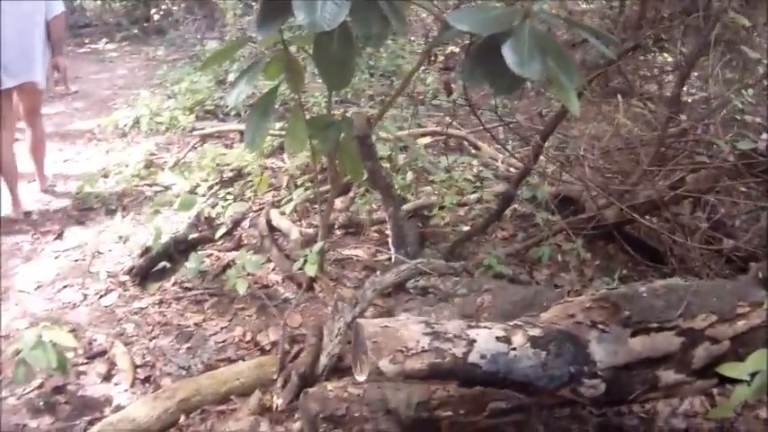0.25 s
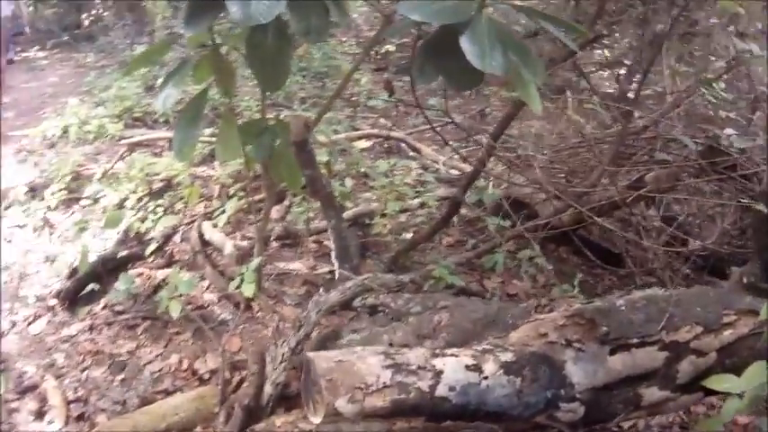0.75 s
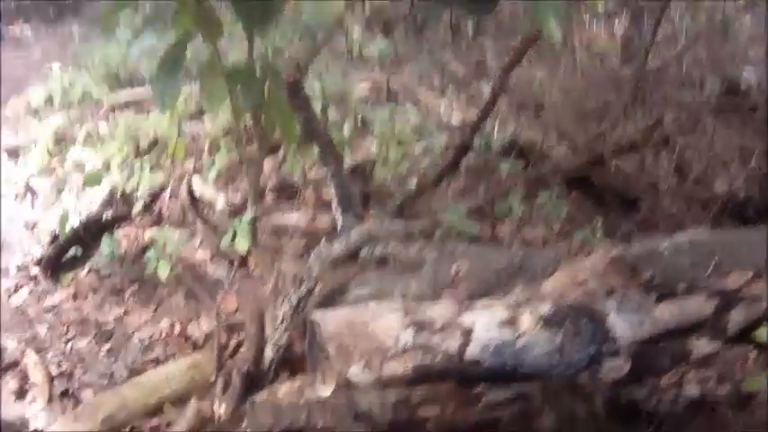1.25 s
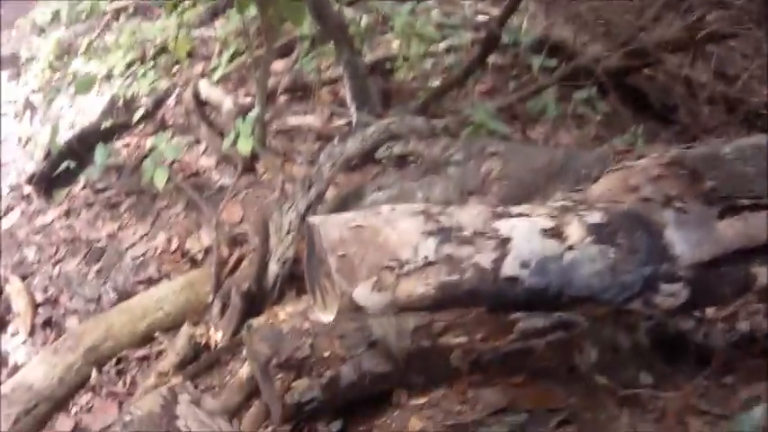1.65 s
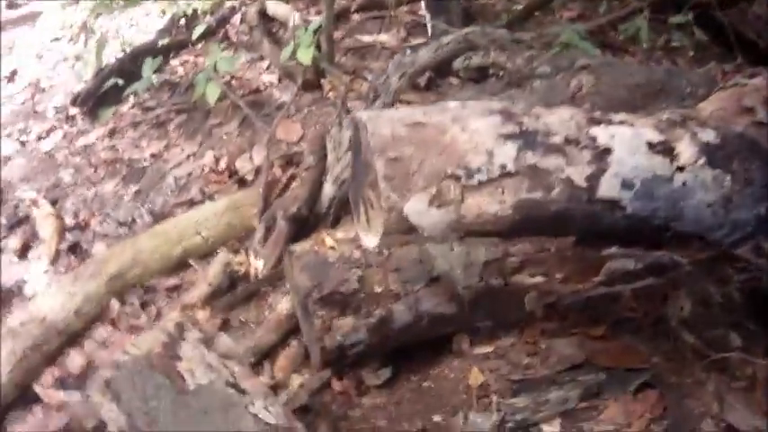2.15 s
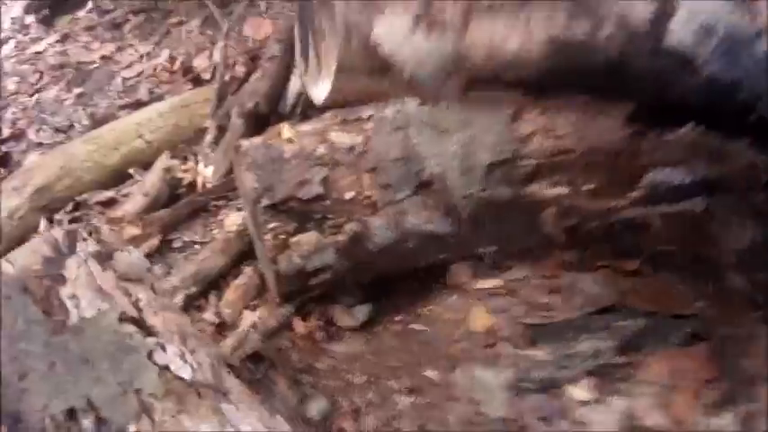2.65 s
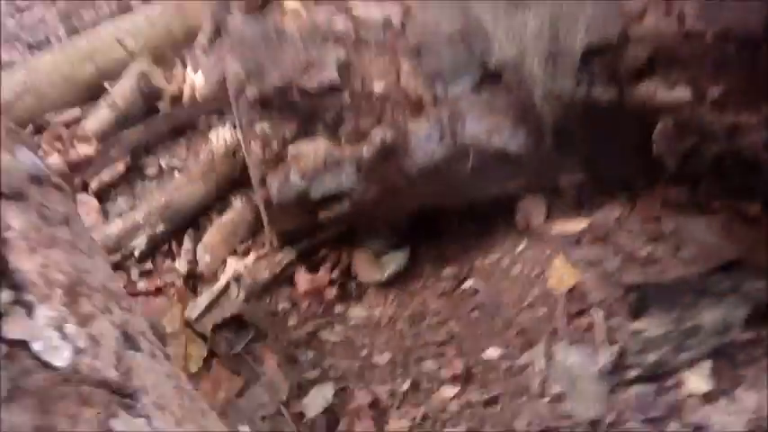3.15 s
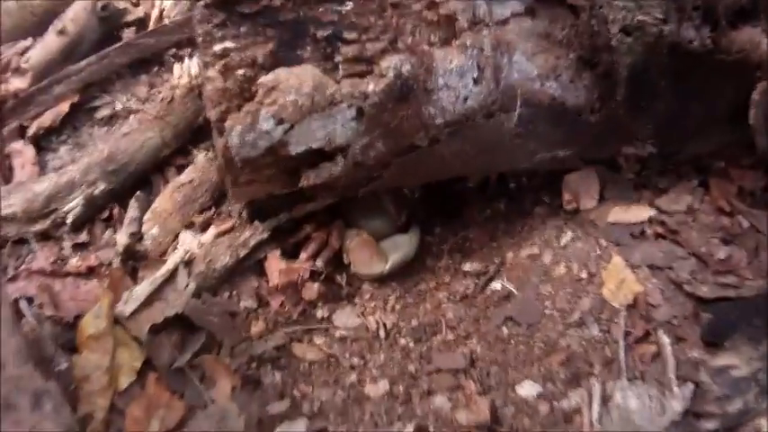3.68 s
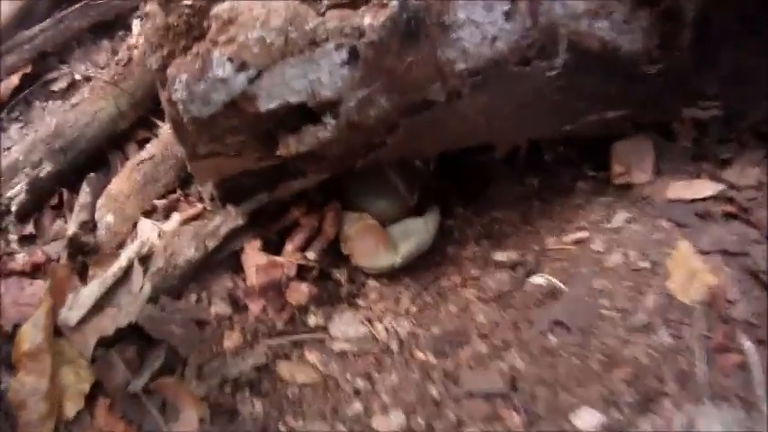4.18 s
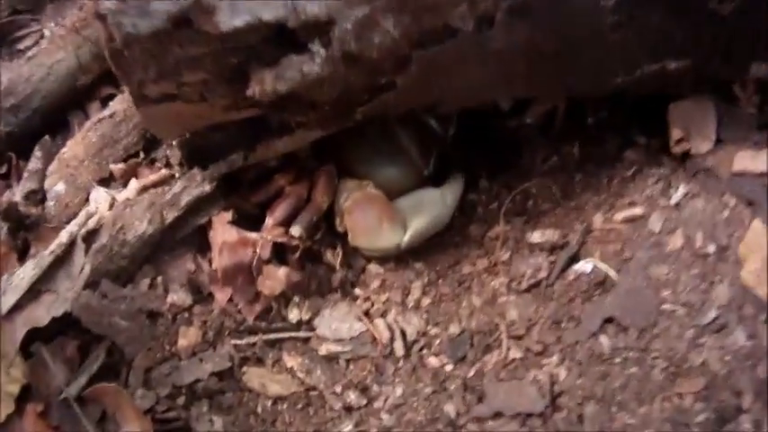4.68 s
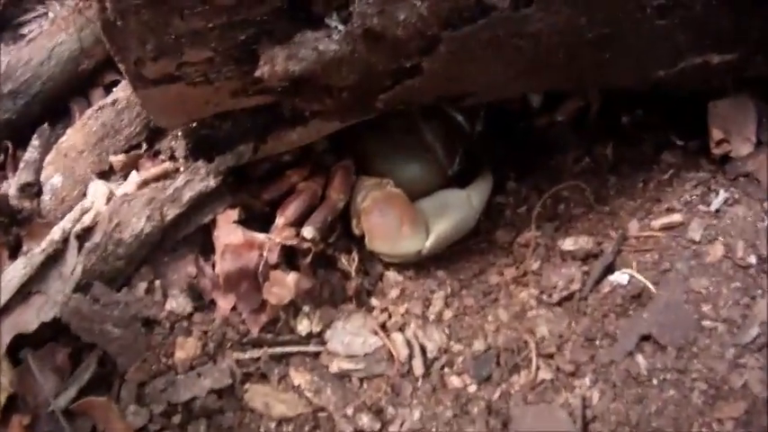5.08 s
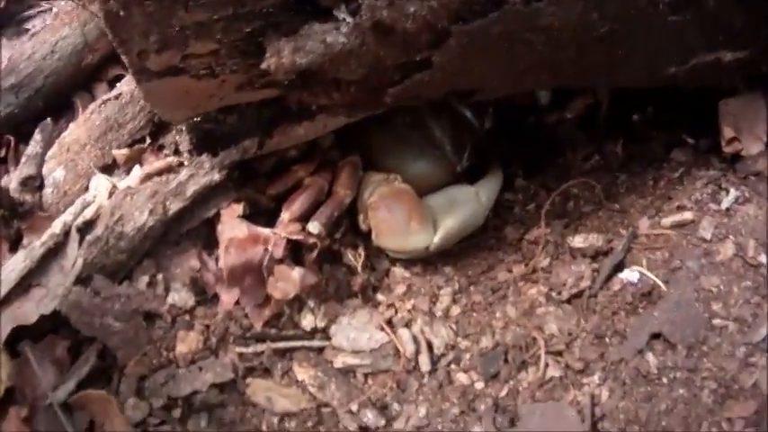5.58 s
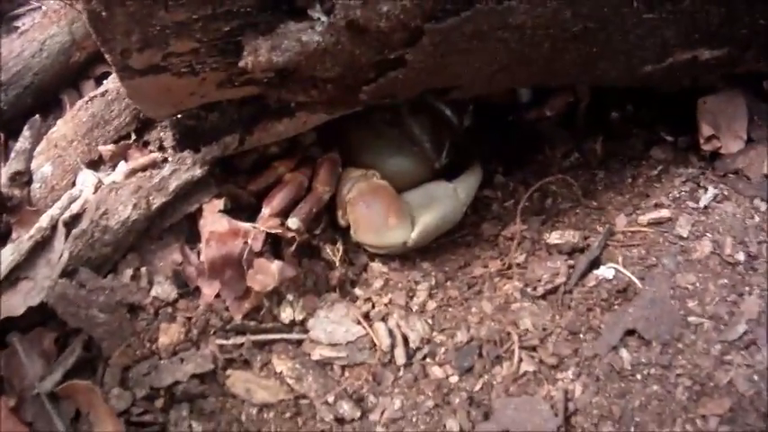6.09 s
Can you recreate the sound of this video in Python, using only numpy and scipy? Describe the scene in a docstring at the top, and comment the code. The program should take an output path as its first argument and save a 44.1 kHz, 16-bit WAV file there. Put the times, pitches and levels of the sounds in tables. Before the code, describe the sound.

Dry leaves rustle and twigs crack underfoot, then something dry scrapes the microphone and snaps loudly against it twice, followed by small ticks.

```python
"""Something dry scrapes along a small camera's case and snaps against it twice, overloading the input.
The scrape is stick-slip friction; each snap rings the hand-damped case. The holder is crouching into
leaf litter on a quiet forest floor: leaves rustle first, twigs crack under the weight, and brittle ticks
and hollow taps follow. Under it all lie hand rumble, one far bird note and the camera's whine and hiss."""
import sys
import numpy as np
from scipy import signal
from scipy.fft import rfft, irfft
from scipy.io import wavfile
from scipy.ndimage import uniform_filter1d

SR = 44100
rng = np.random.default_rng(int(sys.argv[2]) if len(sys.argv) > 2 else 0)


def to_wav(s):
    """Save 16-bit WAV."""
    ch = np.atleast_2d(s).T  # columns
    pcm = np.round(np.clip(ch, -1, 1) * 32767)  # PCM
    wavfile.write(sys.argv[1], SR, pcm.astype(np.int16))


N = 279153
TIME_S = np.arange(N) / SR
HIT_S = TIME_S[:SR // 8]  # time axis of one impact


def amp(db):
    """Decibels to gain."""
    return 10 ** (np.asarray(db) / 20)


def unit(x):
    """Scale to rms 1."""
    return x / np.sqrt(np.mean(x ** 2))


def colour(x, spectrum):
    """Minimum-phase filter from rows of (frequency [Hz], gain [dB])."""
    hz, db = np.transpose(spectrum)
    grid_hz = np.linspace(1, SR / 2, 2049)
    gain = amp(np.interp(np.log(grid_hz), np.log(hz), db))
    cepstrum = irfft(np.log(gain))
    half = len(cepstrum) // 2
    cepstrum[1:half] *= 2
    cepstrum[half + 1:] = 0
    impulse_response = irfft(np.exp(rfft(cepstrum)))
    return signal.fftconvolve(x, impulse_response)[:len(x)]


def ring(x, modes):
    """Parallel resonators from rows of (frequency [Hz], width [Hz], gain [dB])."""
    return sum(amp(db) * signal.lfilter(*signal.iirpeak(hz, hz / width_hz, fs=SR), x)
               for hz, width_hz, db in modes)


def lowpass(x, hz, order=1):
    """Butterworth low-pass."""
    return signal.sosfilt(signal.butter(order, hz, fs=SR, output="sos"), x)


def walk(rate_hz):
    """Smooth random wander, rms 1."""
    hold = int(SR / rate_hz)
    steps = np.repeat(rng.standard_normal(N // hold + 1), hold)
    return unit(uniform_filter1d(uniform_filter1d(steps, hold), hold)[:N])


def patchy(x, spread_db=1.6, rate_hz=45):
    """Narrow bands swell and fade independently as different leaves and edges take part."""
    _, frame_s, bins = signal.stft(x, SR, nperseg=256)
    field = rng.standard_normal(bins.shape)
    frames = max(1, int(1 / (rate_hz * frame_s[1])))
    for axis, size in ((0, 3), (1, frames)):
        field = uniform_filter1d(uniform_filter1d(field, size, axis=axis), size, axis=axis)
    _, fluttering = signal.istft(bins * amp(spread_db * unit(field)), SR)
    return unit(fluttering[:N])


def stroke(start_s, length_s, attack_s, release_s, swell_db=0):
    """Envelope of one movement: attack, a hold that swells up to 1, release."""
    before_s = np.maximum(start_s - TIME_S, 0)
    after_s = np.maximum(TIME_S - start_s - length_s, 0)
    to_go = np.clip(1 - (TIME_S - start_s) / length_s, 0, 1)
    return amp(-swell_db * to_go) * np.exp(-np.minimum(before_s / attack_s + after_s / release_s, 20))


def swell(middle_s, half_s):
    """Bell-shaped envelope."""
    return np.exp(-np.minimum(((TIME_S - middle_s) / half_s) ** 2, 20))


def grains(per_s, spread_db, hiss):
    """Tiny fractures of unequal size over a smooth sliding hiss."""
    size = amp(spread_db * np.minimum(rng.exponential(size=N), 5))
    clicks = (rng.random(N) < per_s / SR) * size * rng.choice([-1, 1], N)
    return unit(unit(clicks) + hiss * rng.standard_normal(N))


def contact(crunch_s, grit, tail_db, tail_s):
    """A sharp push, a short crunch as the surfaces give, and a tail of ground scatter."""
    envelope = np.exp(-HIT_S / crunch_s) + amp(tail_db) * np.exp(-HIT_S / tail_s)
    crunch = envelope * rng.standard_normal(len(HIT_S))
    return (HIT_S == 0) + grit * crunch / np.linalg.norm(crunch)


def add(out, time_s, sound, peak_db):
    """Mix a sound in at the given time and peak level."""
    start = int(time_s * SR)
    out[start:start + len(sound)] += (amp(peak_db) * sound / np.abs(sound).max())[:N - start]


# Hiss spectrum: (frequency [Hz], gain [dB])
HISS_SPECTRUM = [(20, 12.5), (45, 11), (80, 6), (160, 1), (400, 0.5), (1100, 0.5), (2100, -1.5), (3500, 3),
                 (4400, -3.5), (5700, -3), (6500, 1), (8300, -0.5), (8900, -5.5), (15500, -6)]
# Whine lines: (frequency [Hz], rms level [dB], unsteadiness [0-1])
WHINE_LINES = [(5184, -77.5, .4), (5130, -78.5, .5), (7838, -82, .2), (8340, -78, 0.1), (11149, -87.5, .2)]

def camera(buzz_hz=60, pulse_hz=10):
    """Self-noise: steady hiss, thin whine with noisy skirts, faint buzz and pulsing fizz."""
    hiss = amp(-67.5) * unit(colour(rng.standard_normal(N), HISS_SPECTRUM))
    whine = sum(amp(db) * unit(np.sin(2 * np.pi * hz * TIME_S) * (1 + shake * walk(45)))
                for hz, db, shake in WHINE_LINES)
    skirts = amp(-79) * unit(ring(rng.standard_normal(N), [(4880, 93, 0), (8360, 120, -1)]))
    impulses = np.diff(np.floor(TIME_S * buzz_hz), prepend=0)
    buzz = ring(impulses, [(7590, 500, -1), (6900, 560, -5.5)])
    buzz = amp(-75) * unit(ring(buzz, [(7650, 1500, 0)]))
    gate = (.5 + .5 * np.cos(2 * np.pi * pulse_hz * TIME_S)) ** 2
    fizz = ring(rng.standard_normal(N), [(7700, 300, 0), (6592, 350, -2)])
    fizz = amp(-73.5) * unit(gate * ring(fizz, [(7200, 1600, 0)]))
    return hiss + whine + skirts + buzz + fizz


# Grip shifts: (start [s], length [s], level [dB])
GRIP_SHIFTS = [(0.796, 0.095, -62), (1.016, 0.048, -69), (1.565, 0.32, -69.5), (2.12, 0.14, -65),
               (4.2, 1.2, -77.5)]

def handling(rest_db=-81):
    """The hand rumbles through the case, more when its grip shifts."""
    effort = amp(rest_db) + sum(amp(db) * stroke(start_s, length_s, attack_s=.02, release_s=.047)
                                for start_s, length_s, db in GRIP_SHIFTS)
    rumble = unit(lowpass(rng.standard_normal(N), 55, order=2)) * effort * amp(1.6 * walk(25))
    deep_rumble = amp(-66.5) * unit(lowpass(rng.standard_normal(N), 24, order=3))
    return rumble + deep_rumble


def bird(start_s=.43, length_s=.31, start_hz=2180, sag_hz_per_s=270):
    """One thin, far note that sags in pitch, blurred by the trees."""
    envelope = amp(-76) * stroke(start_s, length_s, attack_s=.02, release_s=.03)
    flutter = .7 + .67 * walk(60)
    pitch_hz = start_hz - sag_hz_per_s * np.clip(TIME_S - start_s, 0, length_s)
    pitch_hz *= 1 + .012 * walk(80)
    return envelope * flutter * np.sin(2 * np.pi * np.cumsum(pitch_hz) / SR)


# Leaf litter spectrum: (frequency [Hz], gain [dB])
LITTER_SPECTRUM = [(300, -20), (700, -11.5), (1100, -9.5), (1600, -14.5), (2300, -5.5), (3500, -1.5),
                   (4700, -1.5), (6700, 4), (8000, -0.5), (9200, -13.5), (15000, -27)]
# Shuffles a few steps away: (middle [s], half length [s], level [dB])
LITTER_SHUFFLES = [(0.45, 0.15, -59.5), (0.79, 0.036, -61.5), (1.255, 0.063, -62), (1.803, 0.14, -62.5),
                   (2.053, 0.064, -57), (2.676, 0.19, -59.5), (3.89, 0.13, -68)]

def leaves(crouched_s=3.2, settle_db_per_s=4.5):
    """Litter crackles finely, swells with each shuffle and calms once the person has crouched."""
    stir = amp(-67.5 - settle_db_per_s * np.maximum(TIME_S - crouched_s, 0))
    power = stir ** 2 + sum((amp(db) * swell(middle_s, half_s)) ** 2
                            for middle_s, half_s, db in LITTER_SHUFFLES)
    crackle = patchy(colour(grains(per_s=490, spread_db=3, hiss=.8), LITTER_SPECTRUM))
    return crackle * np.sqrt(power) * amp(walk(41))


# Bump spectrum: (frequency [Hz], gain [dB])
BUMP_SPECTRUM = [(40, 6.5), (150, -5.5), (300, 5.5), (450, -2), (650, 5), (900, -5), (1150, -13),
                 (2000, -8), (5000, -8), (12000, -28)]
# Hand bumps: (time [s], peak [dB])
HAND_BUMPS = [(.587, -50.5), (.657, -52), (.826, -55.5), (1.609, -51.5), (1.63, -49.5), (2.189, -36),
              (2.273, -33), (2.316, -38.5), (2.339, -36.5), (2.545, -29.5)]

def bumps():
    """Soft, dull contacts of the hand."""
    out = np.zeros(N)
    for time_s, peak_db in HAND_BUMPS:
        push = contact(crunch_s=.0056, grit=2.7, tail_db=-11, tail_s=.0034)
        add(out, time_s, colour(push, BUMP_SPECTRUM), peak_db)
    return out


# Hollow resonances: (frequency [Hz], width [Hz], gain [dB])
TAP_MODES = [(335, 40, -6.5), (804, 120, 7.5), (1198, 120, 1.5), (1580, 380, -7), (2200, 550, -15),
             (3166, 320, -10.5), (3800, 360, -10), (4964, 460, -11), (6400, 490, -2.5)]
# Small taps: (time [s], peak [dB])
HOLLOW_TAPS = [(4.673, -37.5), (4.687, -41), (4.751, -37), (4.934, -42.5), (4.984, -33), (5.051, -34.5),
               (5.157, -33), (5.262, -39.5), (5.382, -32.5), (5.413, -32), (5.435, -40.5)]

def taps():
    """Light clicks with a short hollow ring, tuned a little differently at each point of contact."""
    out = np.zeros(N)
    for time_s, peak_db in HOLLOW_TAPS:
        push = contact(crunch_s=.001, grit=1.1, tail_db=-11, tail_s=.0045)
        detune = 1 + .04 * rng.standard_normal(len(TAP_MODES))
        modes = [(hz * ratio, width_hz, db) for (hz, width_hz, db), ratio in zip(TAP_MODES, detune)]
        add(out, time_s, lowpass(ring(push, modes), 8000, order=5), peak_db)
    return out


# Tick spectrum: (frequency [Hz], gain [dB])
TICK_SPECTRUM = [(900, -27), (1700, -23), (2250, 0.5), (3300, -4), (3900, 2), (4350, -9.5), (4850, 6.5),
                 (5600, -8), (6100, -3.5), (7200, -12), (8500, -4), (10700, -20.5), (12500, -14),
                 (15500, -35)]
# Dry ticks: (time [s], peak [dB])
STALK_TICKS = [(4.6483, -29.5), (4.6633, -34), (4.715, -34), (4.7251, -33.5), (4.7525, -32.5),
               (4.7646, -32), (4.7942, -30.5), (4.8168, -29.5), (4.8265, -33), (4.8402, -33.5),
               (4.8593, -34), (4.9105, -27.5), (4.9389, -33.5), (4.9727, -35)]

def ticks():
    """Brittle ticks, as of a dry stalk bending, with finer fibres giving way in between."""
    out = np.zeros(N)
    for time_s, peak_db in STALK_TICKS:
        fracture = contact(crunch_s=.00067, grit=1.64, tail_db=-18, tail_s=.003)
        add(out, time_s, colour(fracture, TICK_SPECTRUM), peak_db)
    fibres = unit(colour(grains(per_s=220, spread_db=2.5, hiss=.33), TICK_SPECTRUM))
    return out + amp(-57) * swell(middle_s=4.726, half_s=.23) * fibres


# Spells of small cracks: (start [s], length [s], typical peak [dB])
CRACK_SPELLS = [(1.781, .2, -45), (2.369, .15, -42.5), (4.259, .13, -46.5), (4.55, .09, -40)]

def lesser_cracks(gap_s=.021, spread_db=2.5, body_offset_db=-14.5):
    """Twigs taking weight crack at uneven intervals; returns rows like TWIG_CRACKS."""
    rows = []
    for start_s, length_s, typical_db in CRACK_SPELLS:
        gap_jitter, level_jitter = rng.standard_normal((16, 2)).T
        delays_s = np.cumsum(gap_s * np.exp(.5 * gap_jitter))
        peaks_db = typical_db + spread_db * level_jitter
        rows += [(start_s + delay_s, db, db + body_offset_db)
                 for delay_s, db in zip(delays_s, peaks_db) if delay_s < length_s]
    return rows


# Spectra of the crack and its woody body: (frequency [Hz], gain [dB])
CRACK_SPECTRUM = [(300, -20.5), (1200, -11.5), (2400, 0.5), (3500, -1.5), (5400, 3.5), (6600, 2.5),
                  (8000, -2), (9300, -15), (15500, -33)]
WOOD_SPECTRUM = [(100, -35), (200, -26), (320, -3.5), (430, -12), (620, 0.5), (860, -5.5), (1220, 3),
                 (1700, -6), (2600, -19), (8000, -33)]
# Twig cracks: (time [s], crack peak [dB], body peak [dB])
TWIG_CRACKS = [(0.8284, -41, -53), (1.6804, -43, -61), (1.8254, -40.5, -53), (1.974, -42, -58),
               (2.2756, -30, -33.5), (2.361, -30.5, -57), (2.3743, -33, -63), (2.4322, -30.5, -72),
               (2.5483, -28.5, -41.5), (2.8073, -45, -45.5), (2.8547, -34, -45), (2.8788, -19.5, -41),
               (2.9456, -25.5, -44), (4.279, -46, -44), (4.2854, -23.5, -40.5), (4.3012, -27.5, -36),
               (4.353, -38.5, -40), (4.3977, -41.5, -41), (4.4394, -37, -51), (4.5527, -36, -41),
               (4.5648, -39, -40.5)]

def twigs():
    """Sharp cracks, each over a slower, woody body."""
    out = np.zeros(N)
    for time_s, crack_db, body_db in TWIG_CRACKS + lesser_cracks():
        crack = contact(crunch_s=.00095, grit=2.15, tail_db=-15.5, tail_s=.0065)
        body = contact(crunch_s=.0032, grit=1.54, tail_db=-1, tail_s=.014)
        add(out, time_s, colour(crack, CRACK_SPECTRUM), crack_db)
        add(out, time_s, colour(body, WOOD_SPECTRUM), body_db)
    return out


# Case resonances, also rung by blows(): (frequency [Hz], width [Hz], gain [dB])
CASE_MODES = [(315, 80, -7.5), (615, 190, -13.5), (1090, 38, 5), (1245, 130, 2), (1564, 180, -2.5),
              (1900, 110, -4), (2098, 100, 2.5), (2461, 170, -7), (2594, 58, -3.5), (3100, 90, -9.5),
              (3290, 130, -1), (3910, 150, -3.5), (4440, 260, -7.5), (5887, 250, -11.5), (6800, 210, -7),
              (7700, 250, -17.5), (10000, 1400, -21.5), (13000, 2000, -25.5)]
# Friction spectrum: (frequency [Hz], gain [dB])
SCRAPE_SPECTRUM = [(150, -34.5), (430, -28.5), (650, -7), (880, -21), (1200, -10), (1700, -12), (2600, -8),
                   (4400, -3), (5600, -3), (6800, 1.5), (8400, -11.5), (10000, -18), (12000, -19),
                   (15500, -31.5)]
# Leaf strokes: (start [s], length [s], end level [dB], case re leaf [dB], leaf resonance [Hz])
LEAF_STROKES = [(1.969, .008, -50.5, -26, 6740), (2.069, 0.015, -46.5, -32, 6900),
                (2.114, 0.068, -46, -12.5, 6900), (2.187, 0.1, -54, -6.5, 5760),
                (2.312, 0.032, -41, -8, 4700), (2.367, 0.16, -58.5, -5, 3400), (2.566, .13, -54, -13, 6700),
                (2.778, 0.039, -44, -17, 6540), (2.839, 0.049, -44, -11, 6800),
                (2.887, 0.024, -32, -6.5, 6250), (2.944, 0.065, -39.5, -8, 5500),
                (3.037, 0.042, -26.5, -8.5, 4300), (3.087, 0.015, -20.5, -1.5, 6200),
                (3.192, 0.053, -54, -2.5, 1690), (4.282, 0.12, -67, 7.5, 1500),
                (4.541, 0.16, -60, -7, 5600)]

def scrapes(leaf_q=5, leaf_ring_db=-4.5):
    """Dry leaves stick and slip along the case: the grains hiss and ring both leaf and case."""
    slips = grains(per_s=2300, spread_db=3, hiss=.79) * amp(1.156 * walk(150))
    surface = patchy(colour(slips, SCRAPE_SPECTRUM))
    drive = grains(per_s=2000, spread_db=1.5, hiss=.76)
    # Each mode waxes and wanes as the contact point travels.
    case = sum(ring(drive, [mode]) * amp(2 * walk(29.92)) for mode in CASE_MODES)
    case = lowpass(unit(case), 7730, order=6)
    out = np.zeros(N)
    for start_s, length_s, end_db, case_db, leaf_hz in LEAF_STROKES:
        leaf_ring = unit(ring(surface, [(leaf_hz, leaf_hz / leaf_q, 0)]))
        leaf = unit(surface + amp(leaf_ring_db) * leaf_ring)
        # Pressure builds until the leaf slips off.
        pressure = stroke(start_s, length_s, attack_s=.0088, release_s=.007, swell_db=4.5)
        out += amp(end_db) * pressure * (leaf + amp(case_db) * case)
    return out


# Dry snap spectrum: (frequency [Hz], gain [dB])
SNAP_SPECTRUM = [(30, 0), (80, 1), (190, -13), (350, -1.5), (620, -3), (830, -14), (1150, 1), (2200, -1.5),
                 (3300, 9.5), (4600, -5.5), (5600, -0.5), (6600, -2.5), (9500, -8.5), (15000, -10)]
# Blows in two clusters: (time [s], ring peak [dB], snap peak [dB], crunch decay [s], ring cutoff [Hz])
CASE_BLOWS = [(3.0878, -2, -24.5, .001, 4020), (3.1187, -5, -10, 0.004, 5120),
              (3.123, 4.5, -8, 0.00042, 1900), (3.1301, -4, -26.5, 0.0011, 2200),
              (3.3402, 4.5, 9, .001, 4030), (3.3417, 2, 9.5, 0.00094, 5970),
              (3.3424, 5.5, 2, 0.00057, 4030), (3.3569, -37.5, -33.5, .002, 5000)]

def blows(hand_damping_s=.014, low_note_hz=570, thump_hz=9):
    """Each blow is a dry snap, a damped case ring and a faint low note; the hardest snap adds a thump."""
    out = np.zeros(N)
    damping = np.exp(-HIT_S / hand_damping_s)
    low_note = np.sin(2 * np.pi * low_note_hz * HIT_S) * np.exp(-HIT_S / .023)
    for time_s, ring_db, snap_db, crunch_s, cutoff_hz in CASE_BLOWS:
        push = contact(crunch_s, grit=.25, tail_db=-37.5, tail_s=.004)
        snap = contact(crunch_s, grit=3.2, tail_db=-35.5, tail_s=.0057)
        add(out, time_s, lowpass(ring(push, CASE_MODES), cutoff_hz) * damping, ring_db)
        add(out, time_s, colour(snap, SNAP_SPECTRUM), snap_db)
        add(out, time_s, low_note, (ring_db + snap_db) / 2 - 53.5)
    hardest_snap_s = max(CASE_BLOWS, key=lambda row: row[2])[0]
    thump = np.sin(2 * np.pi * thump_hz * HIT_S) * np.exp(-HIT_S / .025)
    add(out, hardest_snap_s, thump, peak_db=-39)
    return out


def scene():
    """All sources at one microphone, the same in both channels."""
    background = camera() + handling() + bird() + leaves()
    mono = background + scrapes() + blows() + bumps() + ticks() + taps() + twigs()
    return np.array([mono, mono])


def record(dry):
    """The input clips at full scale; a steep low-pass cuts the top."""
    clipped = np.clip(dry, -1, 1)
    cutoff_hz = 15700
    return signal.sosfilt(signal.ellip(10, .1, 80, cutoff_hz, fs=SR, output="sos"), clipped)


dry = scene()
out = record(dry)
to_wav(out)
```